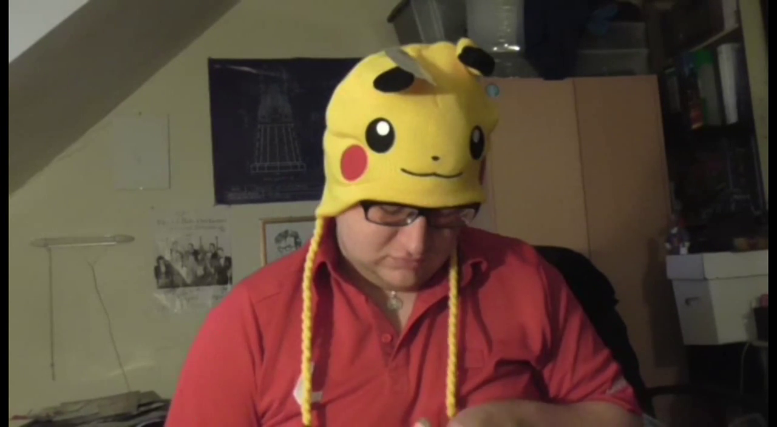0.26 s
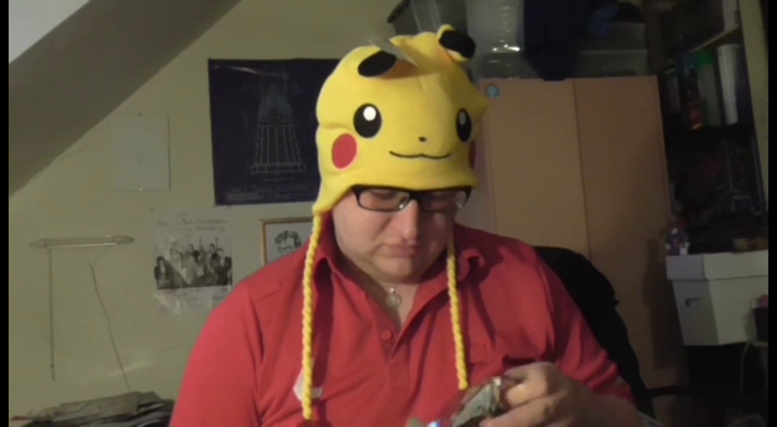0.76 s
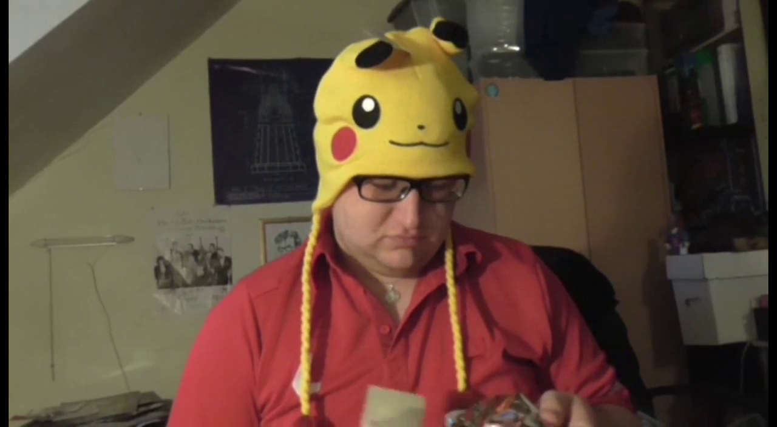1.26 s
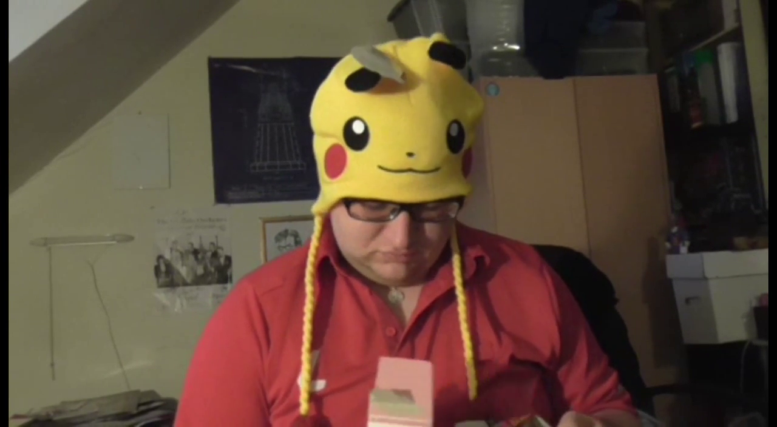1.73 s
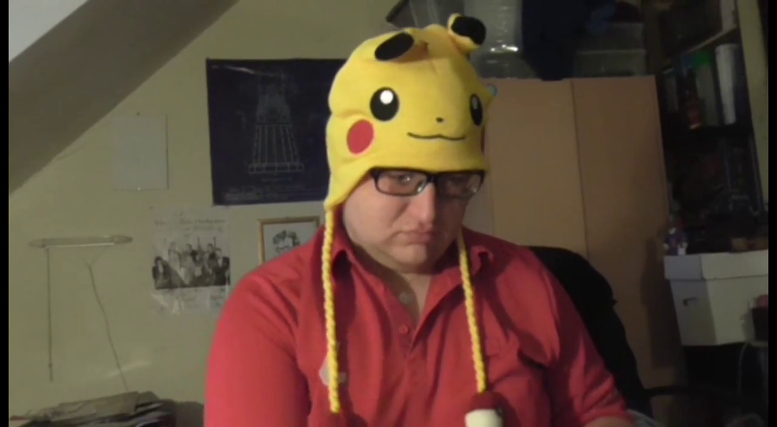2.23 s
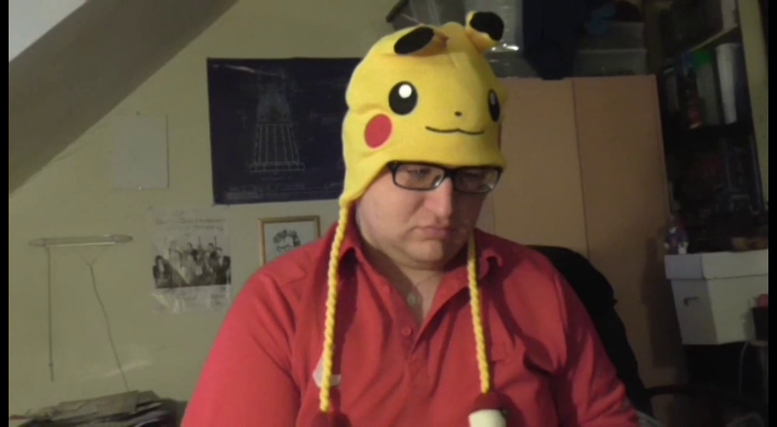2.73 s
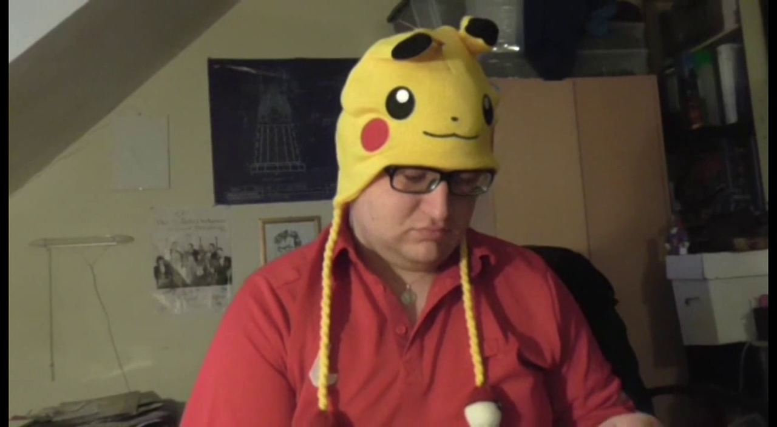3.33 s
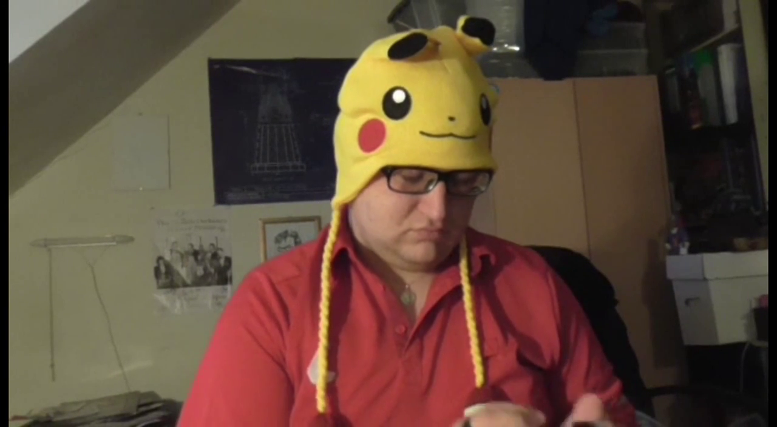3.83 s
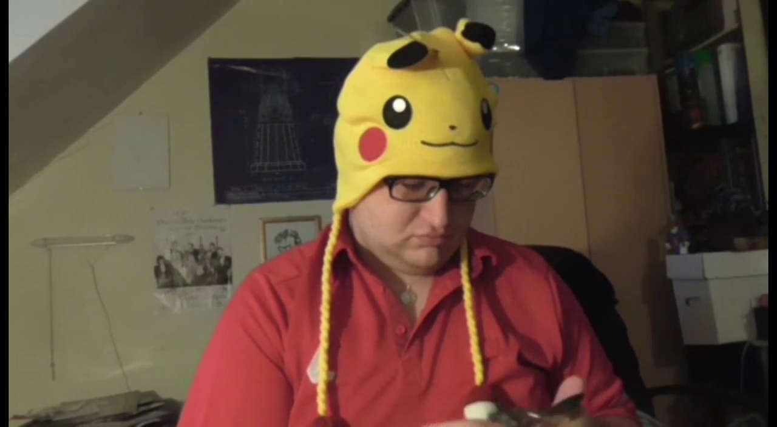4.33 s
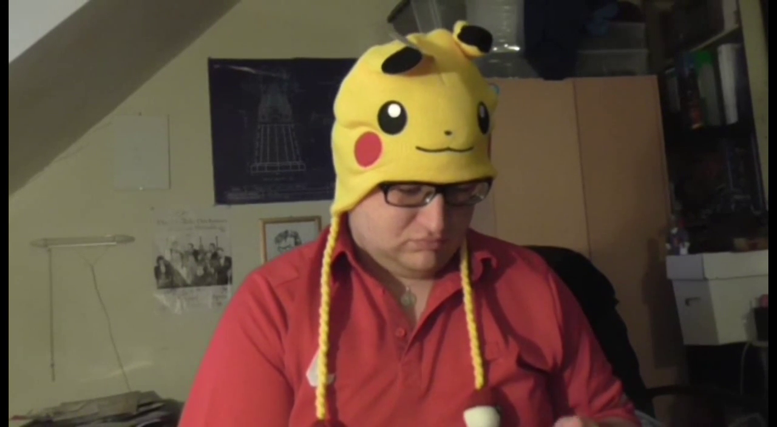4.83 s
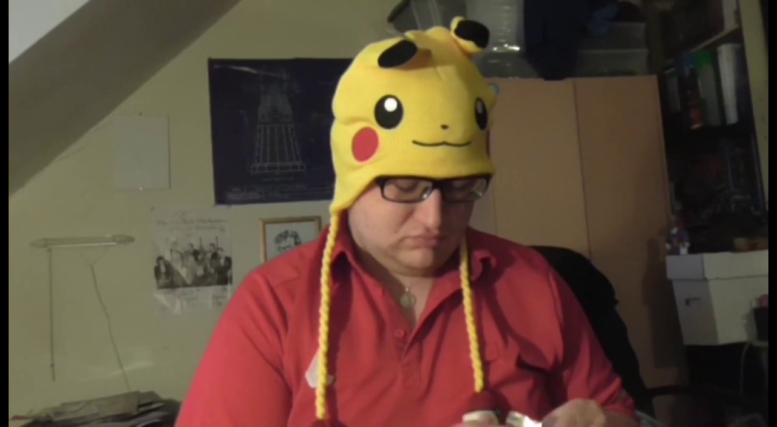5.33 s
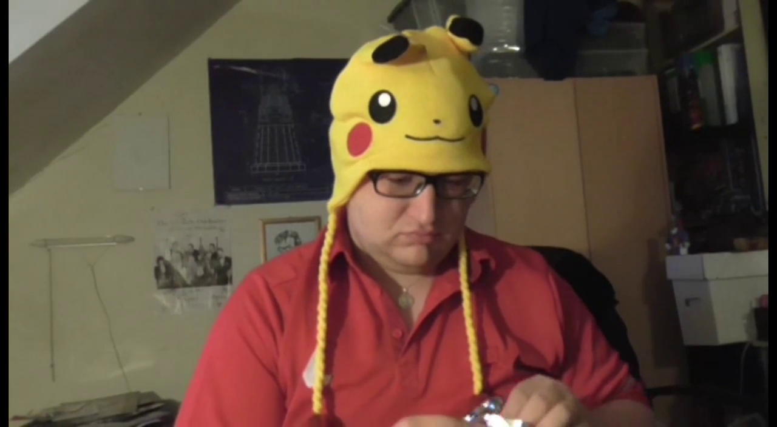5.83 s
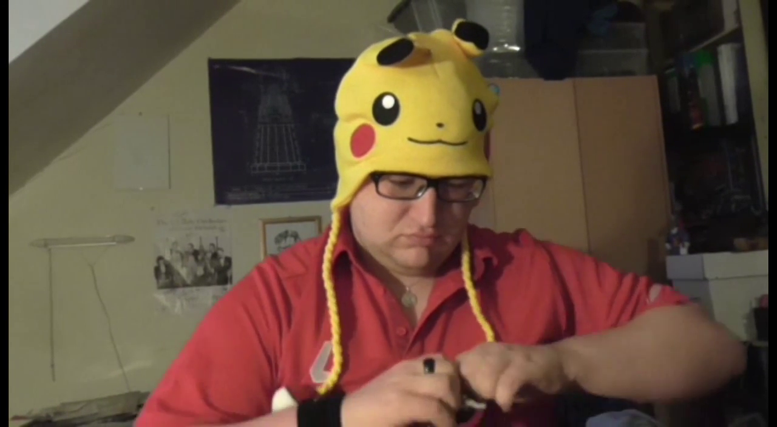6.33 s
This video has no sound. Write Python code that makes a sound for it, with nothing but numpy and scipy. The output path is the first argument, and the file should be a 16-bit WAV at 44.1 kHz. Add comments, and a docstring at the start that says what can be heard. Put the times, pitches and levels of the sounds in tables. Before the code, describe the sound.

In a small furnished room, hands work a foil wrapper at a desk, close to a stereo microphone, with the sound slightly left of centre. Soft ticks begin it; from 0.3 to 0.75 seconds a tight cluster of bright snaps and dull pops peaks around 0.65. Sparse crackles follow, with single sharp snaps near 1.0 and 1.45, then almost only faint room noise and hiss until a snap at 1.9. At 2.4 a strong crackle comes with low, hollow buckling, and from 2.7 to 3.2 the crinkling is dense, briefly over a low rumble. Scattered snaps and a crisp rustle at 3.5 lead to a lull from about 3.95 to 4.4. Then lively, nearly continuous crackling runs on, strongest around 5.2 to 5.5 and 5.9 to 6.2, thinning to a few ticks by 6.6. Reflections are short and dry.

```python
"""A desk in a small furnished room: hands unwrap and crumple a foil wrapper close to a stereo microphone.
Creases snap with bright cracks (short noise bursts through resonances) and panels buckle with dull pops
(soft pushes ringing lower). Ringing grains of fine crackle and dull rustle follow each squeeze of the
fingers, at times over a low rumble; short blunt low pulses lie under some cracks. A notch and echoes stand
for the desk top, a near surface and the walls; shaped noise is the room's low bed and the recorder's hiss."""
import sys
import numpy as np
from scipy import signal
from scipy.fft import rfft, irfft
from scipy.io import wavfile
from scipy.ndimage import uniform_filter1d

SR = 44100
rng = np.random.default_rng(int(sys.argv[2]) if len(sys.argv) > 2 else 0)


def output_pcm(signal):
    """Save a mono or channel-first signal as 16-bit PCM at the path in sys.argv[1].

    Samples are clipped to [-1, 1] before scaling.
    """
    pcm = np.clip(np.atleast_2d(signal).T, -1, 1) * 32767
    wavfile.write(sys.argv[1], SR, np.round(pcm).astype(np.int16))


N = 290178

# The clearest creases snapping:
# (time [s], burst level [dB], ring pitch [Hz], top edge over the ring [dB])
CREASE_SNAPS = [(0.1437, -24.5, 4600, -19), (0.3326, -19.5, 5400, -6), (0.3859, -11, 5230, -29),
                (0.4188, -17.5, 5400, -25), (0.5816, -14, 4870, -17), (0.592, -8, 4800, -25),
                (0.615, -15, 4100, -22), (0.634, -5.5, 5200, -9), (0.6469, -4.5, 5200, -9),
                (0.651, -6, 5100, -25), (0.68, -17, 4000, -21.5), (0.724, -25, 4970, -25),
                (0.757, -19.5, 4660, -15), (0.789, -25, 5200, -32.5), (0.8518, -31, 5440, -28),
                (0.904, -42, 4830, -27), (0.9895, -10, 4900, -42), (1.0587, -31, 4570, -57),
                (1.1408, -22.5, 5200, -13.5), (1.1742, -15, 3150, -26), (1.2376, -24.5, 3640, -29),
                (1.3782, -37.5, 5700, -24), (1.4267, -35, 3970.0, -24), (1.4599, -10, 6300, -18),
                (1.692, -42, 5110, -9), (1.9232, -8.5, 6400, -29), (2.0586, -24.5, 3900, -26),
                (2.1539, -23, 6000, -18), (2.186, -30, 5900, -19), (2.201, -27, 5840, -22),
                (2.397, -7.5, 6850, -24), (2.424, -18, 4540, -10), (2.4376, -10, 5100, -29),
                (2.458, -10.5, 7100, -33), (2.7067, -4.5, 5150, -32), (2.712, -14.5, 6940, -21.5),
                (2.7894, -8, 6100, -2.5), (2.7963, -14.5, 5440, -16), (2.8143, -20.5, 3950, -24),
                (2.856, -5, 6500, -13), (2.8697, -12.5, 5670, -20), (2.9142, -7, 5900, -27),
                (2.9407, -20, 4590.0, -17), (2.9663, -9, 6240, -28), (2.9814, -10, 7000, -10),
                (3.0265, -23.5, 3650, -26), (3.051, -15, 5650, -14), (3.0945, -7.5, 7150, -36),
                (3.1413, -7.5, 5670, -24), (3.1466, -12, 6250, -24), (3.1526, -9.5, 7200, -20),
                (3.1838, -10, 5550, -33), (3.2264, -21.5, 5000, -32), (3.2754, -17.5, 6160, -31),
                (3.3657, -33, 4370, -20), (3.4117, -18, 5200, -27), (3.4269, -26, 6000, -24),
                (3.4952, -12.5, 4530, -7), (3.548, -21, 5300, -23), (3.5664, -9, 4740, -26),
                (3.6191, -19.5, 4600, -31), (3.6281, -11.5, 5200, -30), (3.749, -16.5, 4700, -25),
                (3.764, -8, 7800, -6), (3.7767, -9, 5860, -26), (3.9106, -14.5, 5760, -11),
                (4.4192, -17.5, 4350, -36.5), (4.4371, -7, 6600, -28), (4.44, -15, 6000, -25),
                (4.4585, -8.5, 4660, -28), (4.52, -10, 7200, -15), (4.541, -20, 6500, -20),
                (4.5466, -17, 6400, -26), (4.58, -11, 7860, -9), (4.5917, -14.5, 4800, -14),
                (4.632, -26, 4500, -20), (4.6454, -9, 4360, -20), (4.7492, -25, 5970, -20),
                (4.771, -8, 5200, -29), (4.8267, -19, 5930.0, -23), (4.8631, -19.5, 5600, -26),
                (4.889, -12.5, 5960, -9), (4.9298, -10, 7450, -13), (4.9593, -8, 5470, -24),
                (5.0145, -22.5, 5230, -27), (5.085, -23.5, 7740, -29), (5.1127, -12.5, 5630, -18),
                (5.1765, -17.5, 6040, -19), (5.198, -4, 6300, -30), (5.2487, -24, 5500, -10),
                (5.286, -33, 4970, -25), (5.3126, -20, 4770, -2), (5.3318, -16, 4900.0, -32),
                (5.339, -5.5, 4330, -7), (5.3428, -6, 6430, -32), (5.391, -12, 6260, -14),
                (5.408, -20, 4500, -25), (5.4385, -12, 5830, -18), (5.4417, -7.5, 6500, -33),
                (5.459, -17, 5200, -25), (5.4861, -15, 5200, -25), (5.5276, -16.5, 5230, -21),
                (5.5784, -22, 5730, -21), (5.5932, -13.5, 4770, -25), (5.6192, -9.5, 6200, -8.5),
                (5.6292, -19, 5540, -23), (5.6486, -17.5, 5200, -44), (5.7177, -20.5, 4830, -29),
                (5.775, -20, 5630, -16), (5.7991, -16.5, 5000, -35), (5.8324, -11, 6400, -25),
                (5.896, -28.5, 5060, -19), (5.9306, -8, 5330, -9), (5.9548, -7.5, 7400, -33),
                (5.9636, -12.5, 5500, -29), (6.001, -18.5, 3930, -25), (6.017, -20, 4530, -18),
                (6.0771, -8, 4800, -7.5), (6.1025, -15, 4700, -10), (6.1135, -11.5, 4640, -30),
                (6.123, -10, 6500, -26), (6.1362, -6.5, 5700, -27), (6.1805, -23, 4920, -21),
                (6.1895, -13, 4900, -10), (6.2113, -10.5, 5900, -19), (6.2254, -20, 5370, -25),
                (6.3075, -21.5, 5740, -12), (6.3706, -21, 3200, -30), (6.3845, -16.5, 4150, -27),
                (6.5683, -21.5, 4070, -29)]
# The clearest panels buckling:
# (time [s], burst level [dB], ring pitch [Hz], low thud over the ring [dB])
PANEL_POPS = [(0.078, -36.5, 640, -30), (0.199, -37, 560, -30), (0.2443, -28.5, 1010, -6),
              (0.3218, -17.5, 1113, -17), (0.3844, -9.5, 1340, -34), (0.4206, -16.5, 1477, -17),
              (0.5498, -27, 1140, -36), (0.5985, -21.5, 1216, -43), (0.6148, -15, 1070, -43),
              (0.6505, -7, 1590, -27), (0.702, -21, 370, -19), (0.7526, -19, 895, -17),
              (0.82, -35.5, 800, -16), (0.851, -31, 778, -33), (0.873, -32, 890, -34),
              (0.885, -36.5, 800, -37), (0.9917, -19, 1354, -16), (1.1449, -26, 1710, -46),
              (1.2372, -20, 584, -32), (1.314, -39, 900, -42), (1.379, -37.5, 674, -29),
              (1.4255, -36, 900, -35), (1.4621, -19.5, 1170, -52), (1.9233, -30, 1940, -29),
              (2.0929, -32.5, 1410, -42), (2.146, -37, 880, -30), (2.1552, -25, 1620, -41),
              (2.1855, -29, 1562, -25), (2.401, -16.5, 517, -6), (2.407, -16, 736, -20),
              (2.418, -13.5, 730, -6.5), (2.434, -22, 790, -23), (2.4666, -14.5, 735, -7.5),
              (2.515, -35, 800, -13), (2.5574, -28, 697, -6), (2.67, -39, 607, -2),
              (2.7029, -18, 1870, -20), (2.7104, -19.5, 2020, -28), (2.728, -20.5, 722, -6),
              (2.744, -21.5, 324, -7.5), (2.772, -26, 480, -7), (2.786, -18, 1870, -22),
              (2.797, -28, 875, -19), (2.814, -39, 1100, -28), (2.8583, -25.5, 1560, -11.5),
              (2.867, -26, 1430, -35), (2.968, -20, 1350, -16), (3.0268, -32, 790, -29),
              (3.05, -30.5, 710, -23), (3.078, -25, 663, -36), (3.143, -17.5, 593, -22.5),
              (3.2262, -20.5, 1580, -38), (3.3158, -26.5, 1396, -35), (3.411, -24.5, 1850, -27),
              (3.4957, -18.5, 1350, -42), (3.5663, -28, 1296, -1.5), (3.6215, -21.5, 1327, -22),
              (3.748, -25, 1160.0, -5), (3.7625, -13.5, 1320, -37), (3.777, -15.5, 1550, -16.5),
              (3.8482, -27, 1216, -9.5), (3.9135, -24.5, 670, -20), (4.0137, -28, 1050, -34),
              (4.1989, -29.5, 1160, -30.5), (4.411, -20.5, 1360, -19), (4.4374, -17, 667, -45),
              (4.4601, -14.5, 1500, -40), (4.4795, -17, 604, -45), (4.5139, -21, 1070, -44),
              (4.546, -15, 1313, -47), (4.5805, -20, 1480, -54), (4.6308, -27.5, 600, -43),
              (4.6556, -17.5, 1620, -48), (4.749, -26, 1740, -41), (4.7726, -20, 1500, -43),
              (4.828, -22.5, 607, -38), (4.8615, -19.5, 930, -14), (4.9018, -19.5, 1330, -42),
              (4.9313, -27, 1360, -48), (4.9409, -15.5, 1736, -26), (4.981, -25, 516, -37),
              (5.081, -32, 550, -9), (5.086, -23, 1360, -10), (5.1128, -23.5, 570, -44),
              (5.167, -30.5, 1400, -20), (5.191, -33, 1350, -30), (5.1955, -22, 1150, -9),
              (5.2462, -24.5, 1320, -33), (5.3312, -17, 1540, -42), (5.34, -17.5, 1250, -13.5),
              (5.391, -22, 1540, -44), (5.443, -23, 1340, -21), (5.457, -18, 1400, -33),
              (5.58, -28, 1330.0, -31), (5.591, -16, 1540, -46), (5.6195, -23.5, 770, -29),
              (5.7065, -22, 1550, -47), (5.712, -21.5, 1540, -35), (5.719, -26, 950, -37),
              (5.7614, -30, 662, -34), (5.799, -30, 1880, -35), (5.81, -31, 1400, -35),
              (5.8316, -22.5, 700, -41), (5.9312, -25, 813, -47), (5.9619, -15, 647, -48),
              (6, -25, 1410, -40), (6.0169, -21.5, 1520, -42), (6.023, -29, 1400, -35),
              (6.0821, -21, 1600, -17), (6.1199, -20.5, 714, -40), (6.213, -15.5, 2030, -54),
              (6.2402, -27, 1073, -37), (6.309, -14, 1470, -60), (6.3821, -28, 1760, -32),
              (6.458, -43, 553, -40), (6.491, -42, 590, -40)]
# Each squeeze of the fingers:
# (start [s], hold [s], fine crackle level [dB], dull rustle level [dB])
FINGER_SQUEEZES = [(0.0, 0.13, -59.5, -55), (0.232, 0.1, -54, -48), (0.312, 0.18, -46.5, -39.5),
                   (0.542, 0.03, -56, -43.5), (0.617, 0.14, -42, -33.5), (0.86, 0.01, -50, -56),
                   (1.01, 0.027, -55, -54.5), (1.119, 0.068, -53.5, -55.5), (1.38, 0.044, -81, -61),
                   (1.47, 0.014, -52, -48), (1.922, 0.023, -59, -60.5), (2.136, 0.15, -58, -58),
                   (2.415, 0.035, -46, -42), (2.523, 0.03, -59, -85), (2.725, 0.099, -44, -40),
                   (2.897, 0.15, -46, -44), (3.089, 0.077, -48.5, -46.5), (3.413, 0.028, -60, -51),
                   (3.523, 0.047, -37, -37), (3.763, 0.088, -51, -49.5), (3.925, 0.0059, -49, -42.5),
                   (4.257, 0.079, -70.5, -64.5), (4.427, 0.25, -48.5, -47), (4.809, 0.17, -55, -52),
                   (4.886, 0.06, -39.5, -38), (5.11, 0.24, -58, -50.5), (5.348, 0.14, -45, -44.5),
                   (5.577, 0.081, -47.5, -43), (5.736, 0.013, -59, -46.5), (5.81, 0.067, -53.5, -49),
                   (5.958, 0.16, -58, -54), (6.075, 0.25, -56.5, -50), (6.318, 0.18, -67.5, -62.5)]
BALANCE_DB = -1.64  # left over right: the foil lies a little to the right of the microphone


def from_db(db):
    """Decibels to gain."""
    return 10 ** (np.asarray(db) / 20)


def rms_one(x):
    """Scale to rms 1."""
    return x / np.sqrt(np.mean(x ** 2) + 1e-20)


def peak_one(x):
    """Scale to peak 1."""
    return x / np.abs(x).max()


def at_hz(points, hz):
    """Read a table on a log-frequency axis."""
    p = np.array(points)
    return np.interp(np.log(np.maximum(hz, 1)), np.log(p[:, 0]), p[:, 1])


def colour(x, spectrum):
    """Filter a signal by the spectrum of a table."""
    bins_hz = np.arange(N // 2 + 1) * SR / N
    return irfft(rfft(x) * from_db(at_hz(spectrum, bins_hz)), N)


def butter(x, hz, kind):
    """Second-order Butterworth filter."""
    return signal.sosfilt(signal.butter(2, hz, kind, fs=SR, output="sos"), x)


def resonate(x, hz, width_hz):
    """Two-pole resonance with gain near 1 on top."""
    r = np.exp(-np.pi * width_hz / SR)
    zeros = np.array([1, 0, -1]) * (1 - r * r) / 2
    poles = [1, -2 * r * np.cos(2 * np.pi * hz / SR), r * r]
    return signal.lfilter(zeros, poles, x)


def resonate_twice(x, hz, first_width_hz, second_width_hz):
    """Two resonances in series at one pitch."""
    return resonate(resonate(x, hz, first_width_hz), hz, second_width_hz)


def pan(x, left_over_right_db):
    """Spread a signal over both channels, or tilt a stereo one, by a level difference."""
    return x * from_db([[left_over_right_db / 2], [-left_over_right_db / 2]])


def add(out, s, burst, left_over_right_db):
    """Lay a burst into both channels at time s."""
    i = int(s * SR)
    n = min(burst.shape[-1], N - i)
    out[:, i:i + n] += pan(burst[..., :n], left_over_right_db)


def snaps():
    """A crease gives way in about a millisecond: a jagged burst rings over the body of the sheet.
    The sheet beams its treble unevenly, so each ear gets a little of its own."""
    body_hz = 1400  # the sheet around a crease rings here
    out, t = np.zeros((2, N)), np.arange(400) / SR
    envelope = np.minimum(t / 0.00014, 1) * np.exp(-t / 0.00099)
    creases = small_snaps() + list(CREASE_SNAPS)
    jag = rng.standard_normal((len(creases), 2, len(t) + 1))
    for (s, level_db, hz, top_db), noise in zip(creases, jag):
        both, own = noise[:, 1:] * envelope
        tear = both + 0.3 * butter(own, 6000, "high") * [[1], [-1]]
        ring = resonate_twice(tear, hz, 1.23 * hz, 0.24 * hz)
        ring = ring + 0.71 * resonate(tear, 4030, 2400)
        ring = ring + 0.54 * resonate_twice(tear, body_hz, 900, 900)
        top_edge = peak_one(butter(tear, [9500, 14500], "band"))
        burst = peak_one(ring) + from_db(top_db) * top_edge
        # the first noise sample only scatters the position, by 1.8 dB
        add(out, s, from_db(level_db) * burst, BALANCE_DB + 1.8 * noise[0, 0])
    return out


def small_snaps():
    """Lesser creases snap at random moments, their level following the squeeze they fall in."""
    count = 400
    over_crackle_db, spread_db = 14, 2.5
    pitch_hz, spread_octaves, top_edge_db = 5200, 0.2, -32
    s = rng.random(count) * (N - 1) / SR
    size, pitch = rng.standard_normal((2, count))
    crackle_db = 20 * np.log10(squeezing(s, FINGER_SQUEEZES)[0] + 1e-9)
    level_db = crackle_db + over_crackle_db + spread_db * np.minimum(size, 1.3)
    hz = np.clip(pitch_hz * 2 ** (spread_octaves * pitch), 2000, 12000)
    return [(*row, top_edge_db) for row in zip(s, level_db, hz)]


def pops():
    """A panel flips through: a soft push and fading shiver ring its pitch, its neighbours and a low thud."""
    shiver_cycles = 1.88  # the main shiver fades by a factor e in this many cycles
    out, t = np.zeros((2, N)), np.arange(2200) / SR
    jag = rng.standard_normal((len(PANEL_POPS), len(t)))
    flip = np.minimum(t / 0.00005, 1) * np.exp(-t / 0.00013)
    for (s, level_db, hz, thud_db), noise in zip(PANEL_POPS, jag):
        shiver = 0.3 * np.exp(-t * hz / shiver_cycles) + 0.013 * np.exp(-t / 0.0069)
        # the panel flips towards the microphone or away from it
        push = butter(flip * np.sign(noise[0]) + shiver * noise, 2400, "low")
        ring = resonate_twice(push, hz, 0.24 * hz, 1.35 * hz)
        ring = ring + 0.33 * resonate(push, 1400, 1300)  # neighbouring panels
        thud = resonate(resonate(push, 130, 420), 110, 690)
        burst = peak_one(ring) + from_db(thud_db) * peak_one(thud)
        add(out, s, from_db(level_db) * burst, BALANCE_DB)
    return out


def handling():
    """Fine crackle follows the fingers and flares after the clear snaps, dull rustle after the pops."""
    # Spectrum of the fine crackle: (frequency [Hz], filter gain [dB])
    crackle_colour = [(1470, -3), (2500, 1.5), (5730, -0.5), (8570, 0), (14500, -37.5), (16500, -54.5)]
    # Spectrum of the dull rustle: (frequency [Hz], filter gain [dB])
    rustle_colour = [(59, -74.5), (100, -39.5), (317, -14), (427, -2), (921, 1.5), (3000, 1), (3900, -48),
                     (6600, -120)]
    crackle_gain, rustle_gain = grip(FINGER_SQUEEZES)
    fine_folds = grains(2000, 1.7, 2520, 16000, sharpness=0.94)
    dull_folds = grains(1600, 3.0, 149.6, 2520, sharpness=3.06)
    crackle = rms_one(colour(fine_folds, crackle_colour))
    rustle = rms_one(panel_tilt(colour(dull_folds, rustle_colour)))
    crackle *= crackle_gain + settling(CREASE_SNAPS, flare_db=-20.0, fade_s=0.0049)
    rustle *= rustle_gain + settling(PANEL_POPS, flare_db=-14.5, fade_s=0.0062)
    return pan(crackle + rustle, BALANCE_DB)


def grains(per_s, spread_db, low_hz, high_hz, sharpness):
    """Random tiny folds of uneven size, each ringing briefly at one of twelve pitches."""
    sizes = from_db(spread_db * np.minimum(rng.exponential(1, N), 4)) * rng.choice([-1, 1], N)
    struck = rng.random(N) < per_s / SR
    clicks = sizes * struck * clumps(28.0, spread_db=4.0) + 1e-18
    dealt = rng.integers(0, 12, N)
    out = 0
    for k, hz in enumerate(np.geomspace(low_hz, high_hz, num=12)):
        out = out + resonate(clicks * (dealt == k), hz, hz / sharpness) / np.sqrt(hz)
    return out


def clumps(rate_hz, spread_db):
    """Folds come in bunches: a gain that wanders at random."""
    steps_per_s = 100
    steps = rng.standard_normal(int(N / SR * steps_per_s) + 2)
    r = np.exp(-2 * np.pi * rate_hz / steps_per_s)
    wander = rms_one(signal.lfilter([1], [1, -r], steps))
    smooth = np.interp(np.arange(N) / SR * steps_per_s, np.arange(len(steps)), wander)
    return from_db(spread_db * smooth)


def settling(events, flare_db, fade_s):
    """After each blow the sheet goes on creeping for a moment: a gain that jumps and fades."""
    s, level_db = np.array(events)[:, 0], np.array(events)[:, 1]
    kicks = np.zeros(N)
    np.add.at(kicks, (s * SR).astype(int), from_db(level_db + flare_db))
    return signal.lfilter([1], [1, -np.exp(-1 / (fade_s * SR))], kicks)


def panel_tilt(rustle):
    """The rustle takes the colour of the panel that buckled last: dull on wide ones, bright on narrow."""
    s, hz = np.array(PANEL_POPS)[:, 0], np.array(PANEL_POPS)[:, 2]
    last = np.clip(np.searchsorted(s, np.arange(N) / SR) - 1, 0, None)
    tilt_db = uniform_filter1d(2.4 * np.log2(hz[last] / 1100), size=200)
    dull = signal.sosfiltfilt(signal.butter(2, 950, fs=SR, output="sos"), rustle)
    return from_db(-tilt_db) * dull + from_db(tilt_db) * (rustle - dull)


def squeezing(t, rows):
    """Gains at times t, one per level column: every gesture sets in fast, holds and dies away."""
    grip_db_per_s, let_go_db_per_s = 586, 278
    out = 0
    for s, hold_s, *levels_db in rows:
        before_db = grip_db_per_s * (s - t)
        after_db = let_go_db_per_s * (t - s - hold_s)
        loss_db = np.maximum(np.maximum(before_db, after_db), 0)
        out = out + from_db(np.array(levels_db)[:, None] - loss_db)
    return out


def grip(rows):
    """Gesture gains for every sample, worked out every 40 samples and joined by lines."""
    t = np.arange(0, N + 40, 40) / SR
    return [np.interp(np.arange(N) / SR, t, gain) for gain in squeezing(t, rows)]


def rumble():
    """The hand drags the whole wrapper: coarse low grains swell under it."""
    # Drags of the hand: (start [s], hold [s], level [dB])
    drags = [(0.294, 0.15, -48.5), (0.634, 0.11, -49), (2.5, 0.075, -49.5), (2.736, 0.092, -46)]
    coarse = rms_one(grains(260, 2.6, 250, 610, sharpness=1.4))
    return pan(grip(drags)[0] * coarse, BALANCE_DB)


def low_pulses():
    """One short blunt low pulse under a crack, alternately alike and opposed in the two channels."""
    # Low pulses under some of the loud cracks: (time [s], peak level [dB])
    pulses = [(2.418, -42), (2.966, -46), (3.145, -44), (3.567, -56), (4.93, -50), (5.195, -46),
              (5.341, -47), (6.077, -44)]
    rise_s = 0.00125
    s, peak_db = np.transpose(pulses)
    right_sign = (-1) ** np.arange(len(s))
    kicks = np.zeros((2, N))
    kicks[:, (s * SR).astype(int)] = from_db(peak_db) * [np.ones(len(s)), right_sign]
    t = np.arange(2000) / SR / rise_s
    return signal.oaconvolve(kicks, [t * np.exp(1 - t)], axes=1)[:, :N]


def desk_dip(foil):
    """A reflection off the desk top partly cancels one band."""
    return foil - 0.56 * resonate(foil, 2690, 1320)


def near_echo(foil):
    """A small hard surface about a metre off throws the foil's treble back as one distinct echo."""
    delay_s, level_db, above_hz = .0057, -16, 6500
    bright = butter(foil, above_hz, "high")
    return from_db(level_db) * np.pad(bright, [(0, 0), (round(delay_s * SR), 0)])[:, :N]


def room(foil):
    """The sounding spot wanders over the sheet about every 25 ms, so the echo pattern keeps changing."""
    places, stay = 6, 1100  # spots, each with its own path to the walls; samples per stay
    spot = np.repeat(rng.integers(0, places, N // stay + 1), stay)[:N]
    out = 0
    for k in range(places):
        part = foil * uniform_filter1d(1. * (spot == k), size=200)  # crossfade between spots
        out = out + signal.oaconvolve(part[None], reflections(), axes=1)[:, :N]
    return out


def reflections():
    """Dense echoes set in after about 2 ms and die band by band, partly unlike in the two ears."""
    # How long the walls ring: (frequency [Hz], time to fall by 60 dB [s])
    wall_t60 = [(200, 0.038), (1000, 0.14), (4000, 0.18), (10000, 0.17)]
    # Strength of the reflections: (frequency [Hz], relative level [dB])
    wall_level = [(150, 8.5), (1000, -7.5), (2700, -6.5), (5000, -8), (9000, -13), (13000, -7.5)]
    # Stereo width of the reflections: (frequency [Hz], side over mid [ratio])
    wall_width = [(100, 0.81), (400, 0.29), (3000, 0.63), (9000, 0.87)]
    t, mid, side = np.arange(SR // 3) / SR, 0, 0
    edges = 100 * 2 ** np.arange(0, 7.6, .5)  # half-octave bands
    white = rng.standard_normal((2, 2, len(t)))
    for k, (low, high) in enumerate(zip(edges, edges[1:])):
        hz = np.sqrt(low * high)
        t60 = at_hz(wall_t60, hz)
        mid_band, side_band = butter(white[k % 2], [low, high], "band")
        # the root evens out the energy of long and short decays
        fade = from_db(at_hz(wall_level, hz) - 60 * t / t60) / np.sqrt(SR * t60 / 14)
        mid = mid + fade * mid_band
        side = side + fade * side_band * at_hz(wall_width, hz)
    onset = np.clip((t - .0015) / 0.00099, 0, 1)
    return onset * np.array([mid + side, mid - side])


def hush():
    """Steady low noise of the room and hiss of the recorder: shaped noise with its own stereo width."""
    # Spectrum of the quiet floor: (frequency [Hz], filter gain [dB])
    floor_colour = [(25, -24), (50, -14), (80, -6.5), (165, -13.5), (2740, -22.5), (10300, -28),
                    (12700, -29), (16000, -23)]
    # Stereo width of the floor: (frequency [Hz], side over mid [dB])
    floor_side = [(60, -7.5), (240, 8), (950, 9), (3770, -3), (15000, -0.5)]
    mid_db = -63.5
    mid, side = rng.standard_normal((2, N))
    mid = colour(mid, floor_colour)
    side = colour(colour(side, floor_colour), floor_side)
    return from_db(mid_db) * np.array([mid + side, mid - side]) / np.std(mid)


def scene():
    """Foil, desk, walls, low pulses and the quiet floor; a small sheet radiates no deep bass."""
    foil = butter(snaps() + pops() + handling() + rumble(), 170, "high")
    foil = desk_dip(foil)
    return foil + near_echo(foil) + room(foil.mean(axis=0)) + low_pulses() + hush()


def record(dry):
    """The top rolls off gently; loud peaks are rounded softly and unevenly, with a faint low tick
    under them; the extreme top is cut steeply."""
    softened = butter(dry, 14000, "low")
    rounded = .62 * np.tanh(softened / .62)
    uneven = rounded + 0.18 * rounded ** 2 * [[1], [-.4]]  # left and right lean opposite ways
    return signal.sosfilt(signal.cheby2(12, 70, 17000, fs=SR, output="sos"), uneven)


dry = scene()
out = record(dry)
output_pcm(out)
```